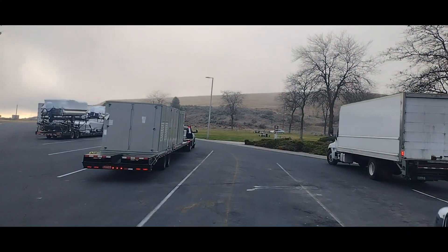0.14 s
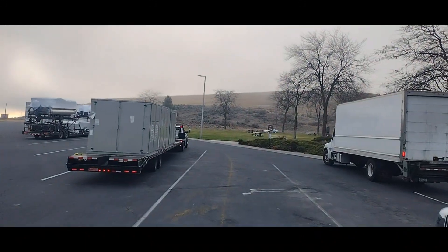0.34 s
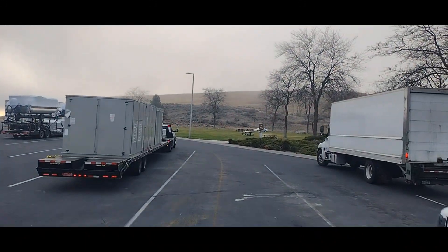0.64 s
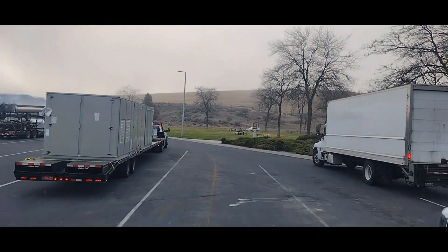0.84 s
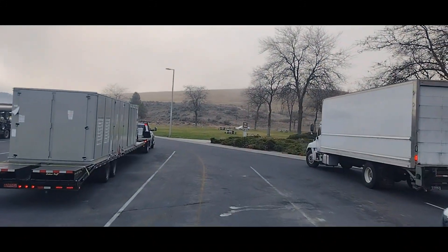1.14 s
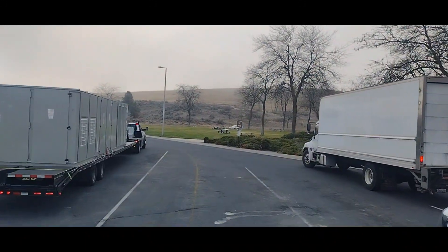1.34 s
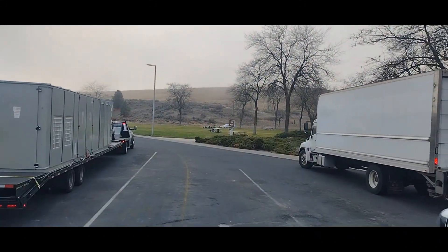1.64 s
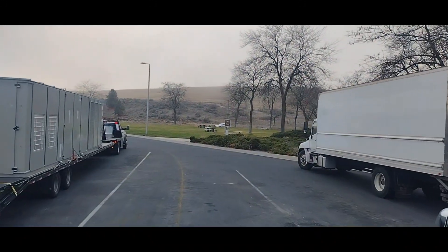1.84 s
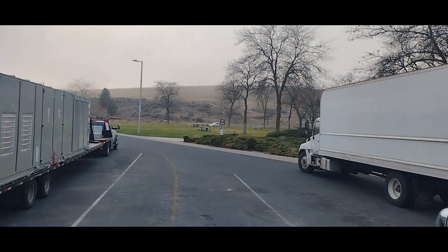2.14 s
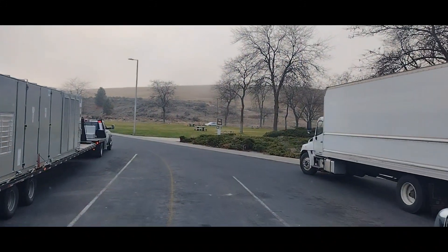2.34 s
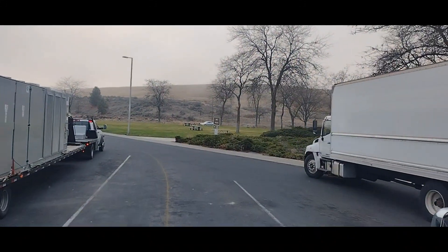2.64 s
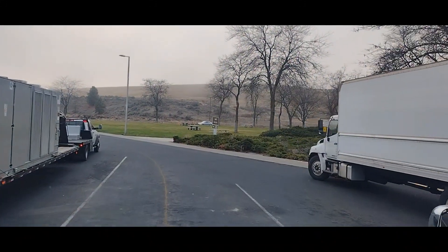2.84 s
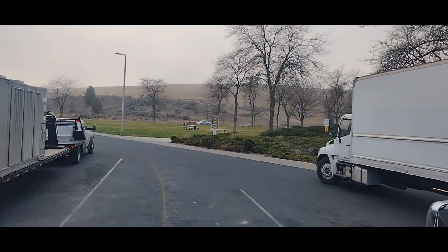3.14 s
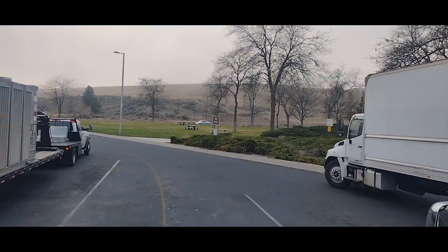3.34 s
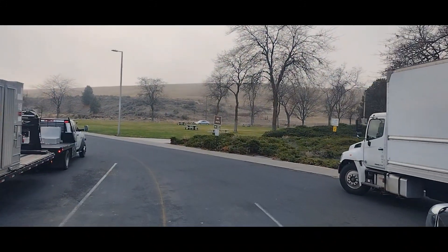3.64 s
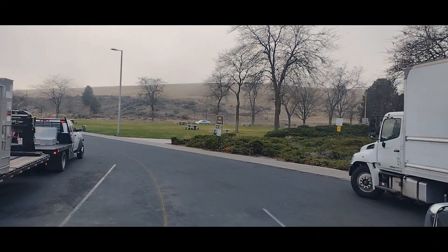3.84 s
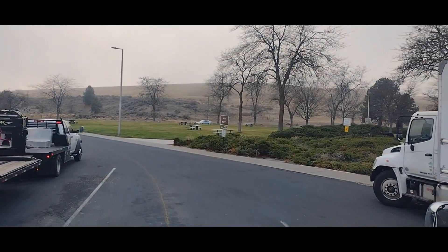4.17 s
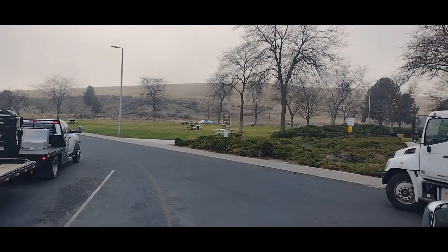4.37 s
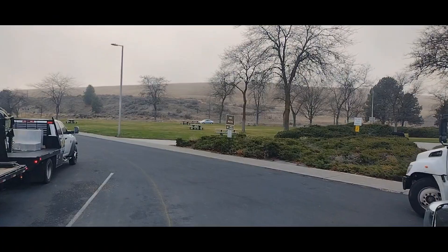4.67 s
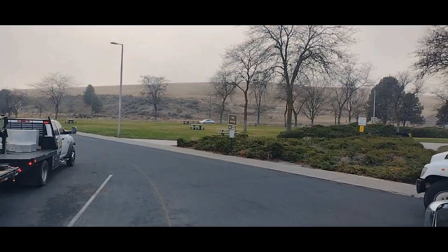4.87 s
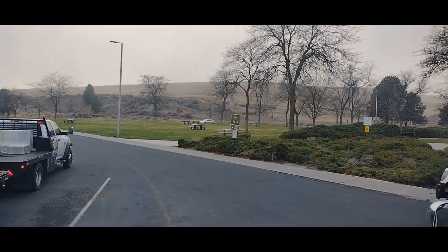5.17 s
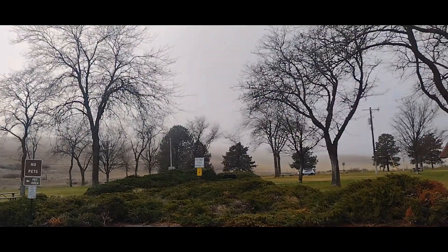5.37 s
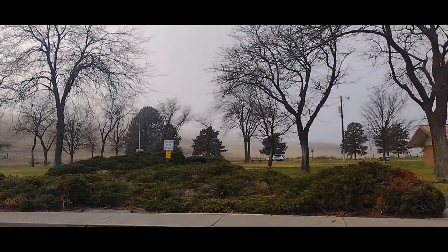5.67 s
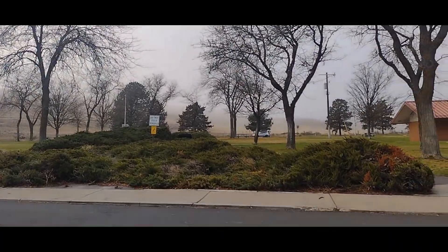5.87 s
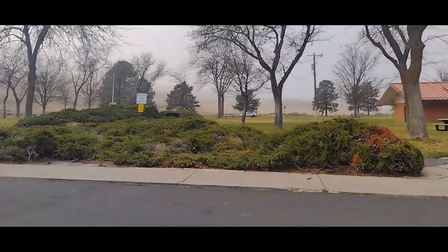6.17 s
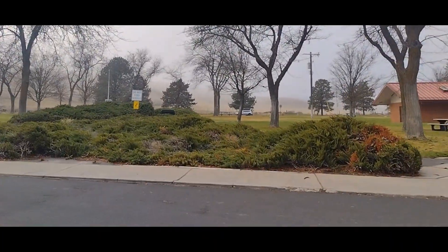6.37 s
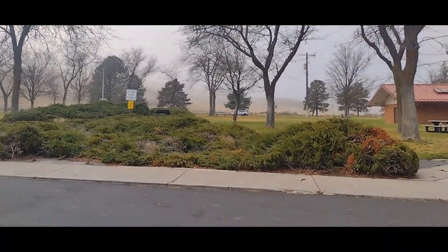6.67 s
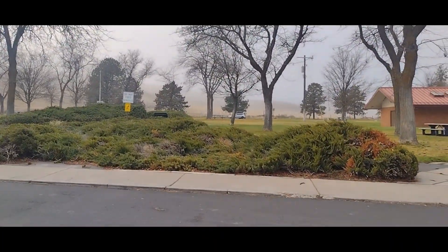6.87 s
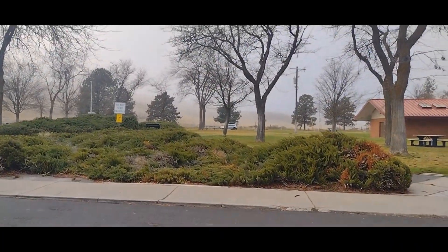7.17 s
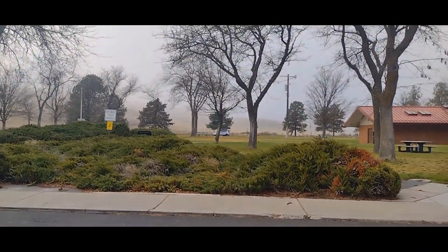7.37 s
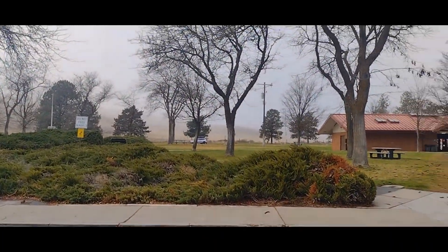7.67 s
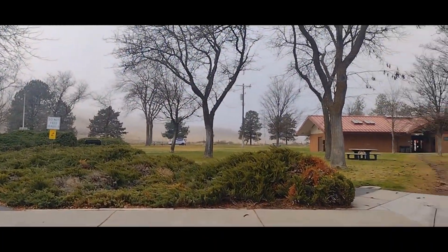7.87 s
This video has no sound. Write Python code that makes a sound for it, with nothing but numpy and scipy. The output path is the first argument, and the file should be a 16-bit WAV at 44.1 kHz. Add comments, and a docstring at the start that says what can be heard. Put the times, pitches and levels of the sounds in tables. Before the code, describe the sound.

Heard in stereo from inside a truck cab moving through a lot. From 0 s a six-cylinder diesel drones with rough clatter, humming panels, a beating metallic ring, low body rumble and a bed of tyre noise and air. Pitch climbs slightly to 2.5 s, with a deep boom swelling around 2 to 3 s. Near 3.1 s there are quick padded knocks, then a soft bump; the load eases, a faint brake groan passes at 3.7 to 4 s, and revs sink and soften toward idle, with small knocks near 4.9 s. At 5.28 s sound cuts to silence. At 5.58 s the engine returns at higher revs, growing quickly, more low and rumbly. Bumps cluster at 5.8 to 6.5 s, again near 7 s, then lighter. A gear whine slides gently down from 6 s; bright ticks, brief rustles, and a late low drone and hiss accompany the slightly slowing engine until 8 s.

```python
"""A six-cylinder diesel truck pulls through a lot, heard inside its cab, then eases off and slows to idle.
After a short silence a second shot fades in, window side: the same engine, a gear whine, bumps and rattles.
The engine is a sum of sines at multiples of its cycle; its clatter is noise, throbbing or repeating each cycle.
Rumble, hiss, tyres and air are coloured noise; bumps, ticks, rustles and knocks are short decaying bursts."""
import sys
import numpy as np
from scipy import signal
from scipy.fft import rfft, irfft, next_fast_len
from scipy.io import wavfile
from scipy.ndimage import uniform_filter1d, map_coordinates

SR = 44100
rng = np.random.default_rng(int(sys.argv[2]) if len(sys.argv) > 2 else 0)


def file_out(sig):
    """Save sig as 16-bit WAV at sys.argv[1]."""
    # one column per channel
    cols = np.atleast_2d(sig).T
    # limit, then scale
    lim = np.clip(cols, -1, 1)
    pcm = np.round(lim * 32767).astype(np.int16)
    wavfile.write(sys.argv[1], SR, pcm)


N = 353241

CUT_OUT_S, CUT_IN_S, FADE_S = 5.283, 5.577, .015
TOP_HZ = 15600

# Firing rate. Each row: time in seconds, rate in Hz.
SPEED = [(0, 56.3), (.9, 58.7), (1.7, 61.2), (2.5, 63.1), (2.75, 62.8), (3.05, 61.5), (3.22, 58.6),
         (3.48, 60.4), (3.62, 59.8), (3.76, 56.2), (4.05, 53.8), (4.5, 44.4), (5.28, 31), (5.58, 66.4),
         (5.9, 66), (6.3, 65.7), (7.5, 63.5), (8.01, 62.5)]
CRANK_START = .1  # part of a cycle already run at the start
# Engine orders. Each row: time in seconds, firing boom in dB, second firing order in dB, uneven orders in dB.
ENGINE = [(0, -71, -32.5, -38), (.7, -60, -37, -40), (1.3, -47, -35, -41.5), (1.62, -53, -38, -45),
          (1.72, -38.5, -37.5, -41.5), (2.08, -29.5, -46, -39), (2.17, -36, -50, -40.5),
          (2.3, -26.5, -34, -47), (2.45, -30.5, -31.5, -40.5), (2.6, -25, -32, -42),
          (2.75, -29, -34.5, -42.5), (3.05, -33, -33.5, -39.5), (3.2, -47, -37, -45.5),
          (3.42, -53, -40, -45), (3.62, -54, -40, -46.5), (3.8, -60, -38, -54), (4.05, -60, -44, -53),
          (4.2, -68, -47, -55), (4.42, -73, -42, -46), (4.6, -69.5, -51, -47), (5.28, -61, -56, -54),
          (5.58, -58, -45, -61.5), (5.85, -40.5, -35, -48), (6.1, -41, -41, -39.5), (6.19, -47, -30.5, -44),
          (6.35, -35, -31, -49.5), (6.48, -34, -25, -41), (6.53, -39, -39, -53), (6.58, -43, -29, -56),
          (6.75, -37, -32, -43.5), (7, -42, -32, -47.5), (7.6, -43, -35, -53), (8.01, -47, -52, -57)]
# Fourth firing order. Each row: time in seconds, level in dB.
FOURTH = [(0, -57), (1.4, -56.5), (1.8, -53), (2.3, -55.5), (4.1, -55.5), (4.35, -48.5), (4.55, -40.5),
          (4.65, -49), (4.8, -43), (5, -48.5), (5.28, -52), (5.58, -69), (5.9, -58), (8.01, -58.5)]
# Cylinders differ, so other orders sound too. Each row: multiple of the cycle, relative level in dB.
UNEVEN = [(5, -15.5), (7, -8), (8, -19), (9, 5.5), (10, 0), (11, -14), (13, -13), (14, -1.5), (15, -4.5),
          (16, -11), (17, -4), (18, -11.5), (19, -12.5), (20, -18), (21, -17), (22, -16.5), (23, -16),
          (25, -21.5), (26, -22), (27, -18.5), (28, -12.5)]
# Swells of uneven orders. Each row: time in seconds, gain above the 20th in dB, gain of the 15th in dB.
UPPER = [(0, 0, -4), (1.4, 0, -2), (1.7, 6, 0), (2.1, 6, -3), (2.4, 1, 0), (3.3, 0, 2), (3.45, 0, 13),
         (3.62, 0, 14), (3.82, 0, 9), (3.95, 0, 0), (8.01, 0, 0)]
# How the cab passes the uneven orders. Each row: frequency in Hz, gain in dB.
CAB = [(40, -14.5), (70, -8.5), (86, -23), (90, -12.5), (94.5, 0), (97, -1), (108, 0.5), (125, -1),
       (150, 0), (180, -0.5), (220, 1), (300, -1.5)]
LOPE_LIFT_DB = 2  # at the window, gain of the uneven multiples not divisible by three
ORDER_SPREAD_RAD = .28  # the cab smears the lope: chance phase lag per order of distance from the 11th

# Engine load, 0 near full pull; it sets clatter and gears, and in the first shot also hiss and panels.
# Each row: time in seconds, load in dB.
LOAD = [(0, -2.5), (.5, -1.5), (2.3, 1), (2.8, 0.5), (3.05, -4.5), (3.6, -10.5), (4, -12.5), (4.6, -16.5),
        (5.28, -20), (5.6, -9.5), (5.72, -1), (5.9, 0), (6.56, -0.5), (7.12, 1.5), (7.65, .5), (7.91, -3.5),
        (8.01, -5.5)]
HISS_PER_LOAD, GEAR_PER_LOAD, PANEL_PER_LOAD = 1, 0.93, 1.01  # dB per dB of load

# Timing gears and pump. Each row: multiple of the cycle, relative level in dB, phase between microphones in rad.
GEARS = [(33, -8, .3), (43, -4, .4), (54, -6, 1.2), (60, 1, 2.3), (66, -5, 1.2), (75, -5, 1.6),
         (84, -2, .6), (90, -5, 1.8), (97, -1, 1.5)]
# Resonances that gear orders cross. Each row: frequency in Hz, half width in Hz, swell in dB.
GEAR_PANELS = [(615.4, 12, 12.5), (850, 13, 3.5), (937, 24, 12)]
GEAR_DB, SIDE_SHADE_DB = -57, -6  # level at zero load; change at the window

# Panels rung by the engine under load. Each row: frequency in Hz, width in Hz, relative level in dB.
PANELS = [(352, 79, -7.5), (442.6, 34, -10), (535, 50, -10.5), (609, 35, -7), (685, 65, -7.5),
          (759, 40, -5), (835.6, 40, -4), (927, 30, -7.5), (1158, 120, -9.5), (2317, 33, -19.5),
          (3380, 90, -35.5), (3750, 80, -33.5), (5740, 190, -34), (6500, 120, -43), (7200, 430, -44.5)]
PANEL_DB, PATTERN_SHARE = -41, .85  # level at zero load; share of the drive's power that repeats each cycle
# One panel rings once a cycle. Each row: time in seconds, level before the beat in dB, beat depth from 0 to 1.
RING = [(0, -52, .9), (.35, -51, .95), (.8, -47, 1), (1.05, -54, .5), (1.5, -50, .7), (1.95, -46, 1),
        (2.2, -46, .95), (2.4, -50, .3), (2.9, -50, .5), (3.1, -58, .5)]
RING_HZ, RING_WIDTH_HZ = 1018, 9
RING_APART_RAD = .3  # phase between the two microphones

# Spectra of rumble, clatter and hiss, in that order. Each row: frequency in Hz, density in dB per Hz.
PULL_COLOUR = ([(15, -46), (25, -29), (55, -12.5), (78, -14.5), (95, -6), (119, -3.5), (155, -10),
               (191, -13.5), (223, -16), (344, -14), (487, -22), (700, -29.5), (910, -53.5), (1540, -120)],
               [(180, -9.5), (300, -7), (409, -17), (442, -2.5), (499, -17), (608, -7.5), (664, -8.5),
               (1010, -5.5), (1080, -7), (1210, -7), (1500, -11), (2090, -15.5), (2500, -29.5), (3680, -47),
               (4200, -57.5), (5460, -72), (9240, -120)], [(1760, -16.5), (3000, 6.5), (3240, -15),
               (3440, 6), (3690, -8.5), (4060, -7.5), (5100, -9), (5740, -3.5), (7250, -5), (7770, -10),
               (8920, -7), (9960, -5.5), (11900, -27), (14700, -39.5), (15600, -21)])
SIDE_COLOUR = ([(15, -48), (25, -35.5), (49, -11.5), (123, 4), (139, -3.5), (184, -3.5), (305, -12),
               (413, -14), (479, -18), (525, -38), (600, -28), (780, -49.5), (1320, -120)], [(180, -32),
               (300, -5.5), (427, -10.5), (474, -7.5), (521, -10), (615, -6.5), (789, -9.5), (1040, -6),
               (1250, -10.5), (1890, -12), (2300, -17.5), (2900, -30.5), (3210, -41), (3600, -62),
               (4680, -68), (7920, -120)], [(1470, -33.5), (2500, -2), (3200, -7), (3600, -9),
               (4300, -11.5), (5380, -17), (9060, -30), (9930, -27), (10700, -29), (14300, -27.5),
               (15600, -29)])
# Likeness of left and right. Each row: frequency in Hz, correlation from -1 to 1.
PULL_LIKE = [(60, 0.99), (130, 0.95), (290, 0.6), (640, 0.23), (1410, -0.28), (3100, 0.17), (6820, -0.11),
             (15000, 0.086)]
SIDE_LIKE = [(60, 0.7), (130, 0.19), (290, 0.82), (640, 0.31), (1410, 0.14), (3100, -0.25), (6820, 0.044),
             (15000, -0.025)]
# Stereo lean before panning. Each row: frequency in Hz, left minus right in dB.
PULL_LEAN = [(60, -0.5), (110, -2.5), (200, 7.5), (380, -4), (700, 6), (1290, 1), (2380, 6), (4400, 9.5),
             (8120, 3), (15000, -0.5)]
SIDE_LEAN = [(60, -7), (110, -2), (200, -6), (380, 1), (700, 2), (1290, 2), (2380, 2), (4400, 2.0),
             (8120, 2), (15000, 2.5)]
PULL_CLATTER_DB, PULL_HISS_DB, PULL_PAN_DB = -38, -62, 1  # clatter and hiss at zero load
SIDE_CLATTER_DB, SIDE_PAN_DB, SIDE_PAN_DB_PER_S = -37, -2, 1.2
# Hiss at the window. Each row: time in seconds, level in dB.
SIDE_HISS = [(5.6, -63.5), (5.75, -59.5), (5.93, -59.5), (6.2, -64), (6.9, -65.5), (7.12, -61.5),
             (8.01, -64.5)]

# Roughness of the ground; it sets body rumble and drumming. Each row: time in seconds, level in dB.
GROUND = [(0, 0.5), (1, -1.5), (2.3, 3.5), (2.75, -3), (3.05, 0.5), (3.55, 0), (3.85, -1), (4.1, -4),
          (4.45, -4), (4.6, -7), (4.85, -5.5), (5.28, -8), (5.6, -29), (5.86, -3.5), (6.5, -0.5), (6.6, -7),
          (6.95, -2), (7.3, -4), (8.01, -4.5)]
RUMBLE_DB, SIDE_RUMBLE_DB, DRUM_DB = -38, -33.5, -38  # at zero roughness
DRUM_RISE_DB_PER_S, DRUM_FULL_S = 3.5, 4.15
# Modes of the truck's body. Each row: frequency in Hz, width in Hz, relative level in dB.
BODY_MODES = [(98.4, 23, -2), (152.3, 15.3, -0.5), (178, 29.5, -6.5)]
# Bumps under the wheels. Each row: start in seconds, level in dB, frequency in Hz, left minus right in dB.
BUMPS = [(3.241, -24, 160, -2), (4.178, -28, 172, -4.5), (5.642, -32, 130, -3), (5.792, -30, 105, 1),
         (5.83, -21.5, 120, -1), (5.912, -16, 143, -8), (5.972, -19.5, 166, -21), (5.995, -21.5, 235, -13),
         (6.03, -23, 142, -4), (6.127, -26, 289, -8), (6.181, -25, 120, 0), (6.214, -15.5, 111, 3),
         (6.434, -15.5, 94, -15), (6.465, -19, 99, -8), (6.495, -22, 99, -11.5), (6.977, -16.5, 122, -14),
         (7.041, -18.5, 124, -9), (7.392, -36, 123, 0), (7.447, -42, 135, 2), (7.674, -31, 111, 16),
         (7.831, -24.5, 138, 14), (7.93, -29, 183, -25)]
SHAKE_DB, SHAKE_T60_S = -13.5, 1.13  # rumble stirred by a bump, relative to the bump

# Gear whine, late low drone and brake groan. Each row: time in seconds, pitch in Hz, level in dB.
WHINE = [(6.02, 492, -56), (6.15, 487, -48), (6.5, 482, -48.5), (6.62, 480, -46), (6.82, 477, -48),
         (6.96, 474.5, -47), (7.12, 472, -54), (7.35, 469, -45.5), (8.01, 460, -50)]
DRONE = [(7.1, 372, -61), (7.4, 380, -48.5), (7.8, 367, -51.5), (8.01, 368, -46)]
GROAN = [(3.7, 573, -53.5), (3.85, 560, -44.5), (3.94, 569, -48), (4.04, 544, -48)]

# Blows. Each row: start in seconds, level in dB, tilt in dB per octave.
KNOCKS = [(3.0858, -34, -2), (3.0922, -25, -1), (3.102, -24, -8.5), (4.095, -34.5, -5), (4.182, -46.5, 5.5),
          (4.881, -42, -15), (4.996, -39, -4.5)]
# What a blow rings. Each row: frequency in Hz, relative level in dB, t60 in seconds.
KNOCK_MODES = [(554, -5, 0.057), (870, -5, 0.13), (1016, 1.5, 0.049), (1157, 3, 0.056), (1395, -4, 0.074),
               (1800, -7.5, .04), (2305, -12, 0.032)]
# Loose things tick. Each row: start in seconds, level in dB, left minus right in dB, centre in Hz.
TICKS = [(4.0935, -69, 0, 14700), (4.1819, -66, 2, 10100), (5.9664, -55, -1, 12600),
         (6.255, -55, -2, 14400), (6.333, -57, -1, 14800), (6.358, -63, -5, 11900), (6.8004, -61, 7, 13900),
         (7.133, -68, 2, 14100), (7.166, -65, 7, 14900), (7.279, -50, 8, 15100), (7.336, -57, 10, 14030),
         (7.6645, -61, 21, 14600), (7.7085, -70, 4, 11000), (7.738, -61, 0, 9820), (7.751, -68, 2.5, 9820),
         (7.994, -53, 0, 14600)]
# Small metal parts. Each row: frequency in Hz, relative level in dB, t60 in seconds.
TICK_MODES = [(8250, -16, .045), (10100, -2.5, .06), (12300, -10, .066), (13000, -13, .04),
              (14000, -7, .057), (14800, -7, .05), (15300, 1, 0.086)]
TICK_SPREAD_OCT, TICK_CLICK_DB = 0.44, 7  # how far from its centre a tick excites modes; its contact click
TICK_WIDTH = .045  # width of the rattling modes, share of their pitch
# Short rustles. Each row: start in seconds, level in dB, left minus right in dB, length in seconds,
# rise in seconds, centre in Hz.
RUSTLES = [(4.17, -76, 2, 0.037, .007, 5200), (4.998, -79, 7, .047, .007, 5200),
           (6.677, -66.5, 16, 0.045, 0.0076, 5200), (6.821, -64.5, 15, 0.063, 0.026, 5200),
           (6.981, -65, 17, 0.07, 0.0081, 5800), (7.662, -60, 23, 0.035, .014, 11000)]
# What the rustling thing rings with. Each row: frequency in Hz, width in Hz, relative level in dB.
RUSTLE_BODY = [(3100, 570, 0), (4240, 600, -1), (5430, 620, -5)]
RUSTLE_GRAIN_DB, RUSTLE_GRAINS_PER_S = 3, 333

# Spectrum of tyres and air. Each row: frequency in Hz, density in dB per Hz.
ROLL_COLOUR = [(290, -25.5), (500, -8.5), (522, 1.5), (686, -2.5), (1350, -28), (2290, -14), (3580, -30),
               (4310, -32), (5050, -37), (6000, -40), (15500, -45)]
# Tyres and air sound under the whole first shot, a little quieter late on. Each row: time in seconds, level in
# dB.
ROLL = [(0, -50.5), (3, -49), (3.5, -51), (4, -49.5), (4.5, -54), (5, -55), (5.28, -55.5)]
# A band of hiss swells late. Each row: time in seconds, level of the noise before the band in dB.
SIZZLE = [(6.7, -78), (7, -70), (7.2, -58), (7.65, -56), (8.01, -56)]
SIZZLE_HZ, SIZZLE_WIDTH_HZ = 4300, 260
SIZZLE_LOW_HZ, SIZZLE_LOW_WIDTH_HZ, SIZZLE_LOW_DB = 2780, 350, 9.5  # a lower band that swells with it


def undb(db):
    """Decibels to amplitude ratio."""
    return 10 ** (np.asarray(db) / 20)


def curves(table):
    """Linear interpolation: the columns of a time table, one value a sample."""
    s, *columns = np.transpose(table)
    return [np.interp(np.arange(N) / SR, s, c) for c in columns]


def over_hz(table, hz):
    """A (Hz, value) table read on a log-frequency axis."""
    f, v = np.transpose(table)
    return np.interp(np.log(hz + 1), np.log(f + 1), v)


def walk(rate, count=1):
    """Random levels held 1 / rate s and smoothed twice by a moving mean; spread near 1."""
    k = int(SR / rate)
    held = np.repeat(rng.standard_normal((count, N // k + 1)), k, axis=1)[:, :N]
    return 1.7 * uniform_filter1d(uniform_filter1d(held, k), k)


def pan(x, db):
    """Level difference between channels: left minus right in dB."""
    return x * undb(np.array([db, -db]) / 2).reshape(2, -1)


def band(x, hz, width_hz):
    """Two-pole resonance with gain 1 at the centre."""
    return signal.lfilter(*signal.iirpeak(min(hz, .45 * SR), hz / width_hz, SR), x)


def mode(x, hz, width_hz):
    """A noise-driven resonance, its gain raised to offset the power a narrow band loses."""
    return band(band(x, hz, width_hz), hz, 3 * width_hz) * np.sqrt(SR / width_hz / np.pi)


def noise(colour, like, lean, patchy_db, rate):
    """Partly correlated stereo noise of a given colour whose half-octaves flicker apart; rms 1."""
    hz, s, cells = signal.stft(rng.standard_normal((2, N)), SR, nperseg=512)
    rows, cols = np.meshgrid(2 * np.log2(hz + 50), s * rate, indexing="ij")
    grid = rng.standard_normal((32, int(N / SR * rate) + 3))
    patches = map_coordinates(grid, [rows, cols], order=1)
    flickering = signal.istft(cells * undb(patchy_db * patches), SR, nperseg=512)[1]
    mid, side = rfft(flickering, next_fast_len(N))
    hz = np.linspace(0, SR / 2, len(mid))
    c = np.clip(over_hz(like, hz), -.99, .99)
    pair = np.sqrt(1 + c) * mid + np.sqrt(1 - c) * side * np.array([[1], [-1]])
    coloured = pan(pair * undb(over_hz(colour, hz)), over_hz(lean, hz))
    x = irfft(coloured, next_fast_len(N))[:, :N]
    return x / x.std()


def tone(hz, db, waver_db=3.0, rate=8, waver_hz=0, apart_rad=0):
    """A stereo sine about the given rms level, wavering in level and pitch."""
    level, pitch = walk(rate, count=2)
    phase = 2 * np.pi * np.cumsum(hz + waver_hz * pitch) / SR
    return np.sqrt(2) * undb(db + waver_db * level) * np.sin(phase + apart_rad * np.array([[-.5], [.5]]))


def add_at(out, s, burst):
    """Superposition: a burst added from s seconds on."""
    out[..., int(s * SR):][..., :burst.shape[-1]] += burst


def engine_orders(hz, cycle):
    """Harmonic series of the cycle: firing orders boom in the cab; weaker multiples make the lope."""
    window = np.arange(N) / SR > CUT_OUT_S
    boom_db, second_db, uneven_db = curves(ENGINE)
    second_db = second_db + 0.61 * window * walk(18)[0]
    fourth_db = curves(FOURTH)[0] + 3.3 * walk(7)[0]
    upper_db, fifteenth_db = curves(UPPER)
    orders = [(6, boom_db), (12, second_db), (24, fourth_db)]
    for k, db in UNEVEN:
        order_db = uneven_db + db + over_hz(CAB, k * hz / 6)
        order_db = order_db + LOPE_LIFT_DB * window * (k % 3 > 0)
        orders.append((k, order_db + upper_db * (k > 20) + fifteenth_db * (k == 15)))
    out, drift = 0, walk(2.5, count=6)
    for i, (k, db) in enumerate(orders):
        # the two microphones sit at different spots of the cab's sound field
        apart = 0.14 * (-1) ** i * np.array([[1], [-1]])
        lag = ORDER_SPREAD_RAD * abs(k - 11) * rng.uniform(-1, 1)
        phase = k * cycle - lag + .3 * drift[(i + 3) % 6] + apart
        out = out + np.sqrt(2) * undb(db + .8 * drift[i % 6]) * np.sin(phase)
    return out


def gears(hz, load_db):
    """Tooth-rate orders of timing gears and pump swell as they cross panel resonances."""
    gear_db = GEAR_DB + GEAR_PER_LOAD * load_db + SIDE_SHADE_DB * (np.arange(N) / SR > CUT_OUT_S)
    out = 0
    for k, db, apart in GEARS:
        f = k * hz / 6
        swell_db = sum(p_db / (1 + ((f - p_hz) / w) ** 2) for p_hz, w, p_db in GEAR_PANELS)
        out = out + tone(f, gear_db + db + swell_db, waver_db=3.5, rate=3.47, apart_rad=apart)
    return out


def clatter_pattern(cycle):
    """Periodicity: valves and pistons clatter alike every cycle, in a slowly changing pattern; rms 1."""
    turns = irfft(np.exp(2j * np.pi * rng.random((2, 2, 2049))))  # two flat-spectrum stereo patterns
    place = (cycle / (2 * np.pi) % 1 * 4096).astype(int)
    mix = np.pi / 4 + .5 * walk(1.05)[0]
    return (np.cos(mix) * turns[0][:, place] + np.sin(mix) * turns[1][:, place]) / turns.std()


def panel_hum(shake, load_db):
    """Forced resonance: narrow panel modes fed by the engine's clatter fade with the load."""
    hum = sum(undb(db + 2.34 * walk(2.07)) * mode(shake, hz, w) for hz, w, db in PANELS)
    return undb(PANEL_DB + PANEL_PER_LOAD * load_db) * hum


def ringing_panel(shake, cycle):
    """Amplitude modulation: one panel's tone beats once a cycle, with a band of clatter around it."""
    ring_db, depth = curves(RING)
    ring = tone(np.full(N, 1. * RING_HZ), ring_db, waver_db=0.4, waver_hz=0.66, apart_rad=RING_APART_RAD)
    beat = 1 + np.clip(depth, 0, 1) * np.cos(cycle + 1.6)
    struck = ring * beat * (np.arange(N) / SR < RING[-1][0])
    return struck + .5 * band(struck * shake, RING_HZ, RING_WIDTH_HZ * 8)


def panels(cycle, load_db):
    """Shared excitation: repeating clatter and plain noise drive all the panels."""
    loose = rng.standard_normal((2, N))
    shake = np.sqrt(1 - PATTERN_SHARE) * loose + np.sqrt(PATTERN_SHARE) * clatter_pattern(cycle)
    return panel_hum(shake, load_db) + ringing_panel(shake, cycle)


def cab_noise(rumble_gain, clatter_db, hiss_db, colour, like, lean, cycle, rumble_patchy_db, throb):
    """Broadband noise: body rumble, clatter modulated by the firings, and hiss, each on its own level."""
    pulse = 1 + throb * np.cos(6 * cycle) + throb * np.cos(3 * cycle)
    rumble = rumble_gain * noise(colour[0], like, lean, rumble_patchy_db, 14)
    clatter = undb(clatter_db) * pulse * noise(colour[1], like, lean, 1.7, 6)
    hiss = undb(hiss_db) * noise(colour[2], like, lean, 0.94, 7.3)
    return rumble + clatter + hiss


def drumming(ground_db):
    """Modal excitation: noise of the uneven ground drums the body modes."""
    ground = 1.22 * rng.standard_normal(N) + .5 * rng.standard_normal((2, N))  # common and separate parts
    drum = sum(undb(db + 1.0 * walk(5)) * mode(ground, hz, w) for hz, w, db in BODY_MODES)
    rise_db = DRUM_RISE_DB_PER_S * np.minimum(np.arange(N) / SR - DRUM_FULL_S, 0)
    return undb(DRUM_DB + ground_db + rise_db) * drum


def wheel_bumps():
    """Impulse response: each bump is a damped sine; also returns the power of the shaking it leaves."""
    bumps, shaking, t = np.zeros((2, N + SR)), np.zeros(N + SR), np.arange(SR // 2) / SR
    for s, db, hz, pan_db in BUMPS:
        thump = np.minimum(t / 0.0061, 1) * undb(-60 * t / 0.081) * np.sin(2 * np.pi * hz * t)
        add_at(bumps, s, pan(undb(db) * band(thump, hz, 2.2 * hz), pan_db))
        shake = np.minimum(t / 0.0057, 1) * undb(db + SHAKE_DB - 60 * t / SHAKE_T60_S)
        add_at(shaking, s, shake ** 2)
    return bumps[:, :N], shaking[:N]


def lone_tones():
    """Sines of gliding pitch: the gear whine, the late drone and the brake groan."""
    out, t = 0, np.arange(N) / SR
    for table, waver_db in ((WHINE, 1.8), (DRONE, 2.2), (GROAN, 1.1)):
        sounding = (t > table[0][0]) * (t <= table[-1][0])
        out = out + tone(*curves(table), waver_db=waver_db, rate=20, waver_hz=1.3) * sounding
    return out


def knocks():
    """Modal decay: a padded blow rings a few damped sines under a short noisy clack."""
    out, t = np.zeros((2, N + SR)), np.arange(SR // 2) / SR
    soft = np.minimum(t / 0.0036, 1) ** 2  # a padded blow takes a few ms to build
    for s, db, tilt_db in KNOCKS:
        knock = 0
        for k, (hz, mode_db, t60) in enumerate(KNOCK_MODES):
            level_db = mode_db + tilt_db * np.log2(hz / KNOCK_MODES[0][0]) - 60 * t / t60
            phase = k * np.array([[k], [k + 1.16]])
            knock = knock + undb(level_db) * np.sin(2 * np.pi * hz * t + phase)
        rough = band(band(rng.standard_normal((2, len(t))), 2500, 3700), 3300, 7000)
        clack = 0.18 * undb(2 * tilt_db) * rough * undb(-60 * t / 0.14)
        add_at(out, s, pan(undb(db) * soft * (knock + clack), 3.3))
    return out[:, :N]


def ticks():
    """Selective excitation: a contact click and decaying noise bands at the modes near its centre."""
    out, t = np.zeros((2, N + SR)), np.arange(SR // 2) / SR
    for s, db, pan_db, hz in TICKS:
        ring = 0
        for f, mode_db, t60 in TICK_MODES:
            a, b = rng.standard_normal(2)  # chance level and pitch
            off_db = 6 * (np.log2(f / hz) / TICK_SPREAD_OCT) ** 2
            width_hz = TICK_WIDTH * f
            rattle = band(rng.standard_normal((2, len(t))), f * (1 + .012 * b), width_hz)
            rattle = rattle * np.sqrt(SR / (2 * np.pi * width_hz))
            ring = ring + undb(mode_db + 2.4 * a - off_db - 60 * t / t60) * rattle
        click = undb(TICK_CLICK_DB - 60 * t / 0.025) * band(rng.standard_normal((2, len(t))), hz, 0.5 * hz)
        add_at(out, s, pan(undb(db) * (ring + click) * np.minimum(t / 0.004, 1), pan_db))
    return out[:, :N]


def rustles():
    """Friction noise: short swells of grainy scratching, coloured by resonances."""
    out, t = np.zeros((2, N + SR)), np.arange(SR // 2) / SR
    for s, db, pan_db, length, rise, hz in RUSTLES:
        swell = np.minimum(t / rise, 1) * np.exp(-(t / length) ** 2.4)
        grain_db = RUSTLE_GRAIN_DB * walk(RUSTLE_GRAINS_PER_S)[0, :len(t)]
        grain = undb(grain_db) * rng.standard_normal(len(t))
        scratch = band(grain, hz, 1.3 * hz)
        scratch = scratch + sum(undb(b_db) * band(grain, b_hz, w) for b_hz, w, b_db in RUSTLE_BODY)
        add_at(out, s, pan(undb(db) * scratch * swell, pan_db))
    return out[:, :N]


def tyres_and_air():
    """Flow and contact noise: a broadband bed with its own slow level."""
    return undb(curves(ROLL)[0]) * noise(ROLL_COLOUR, PULL_LIKE, PULL_LEAN, 1.0, 6.5)


def sizzle():
    """Band-passed noise: two bands of hiss swell together late."""
    out, swell_db = 0, curves(SIZZLE)[0]
    for hz, w, db in ((SIZZLE_HZ, SIZZLE_WIDTH_HZ, 0), (SIZZLE_LOW_HZ, SIZZLE_LOW_WIDTH_HZ, SIZZLE_LOW_DB)):
        out = out + undb(swell_db + db) * band(band(rng.standard_normal((2, N)), hz, w), hz, w)
    return out


def scene():
    """Superposition of the sources in two shots, with silence between them."""
    t, (hz,), (load_db,), (ground_db,) = np.arange(N) / SR, curves(SPEED), curves(LOAD), curves(GROUND)
    cycle = 2 * np.pi * (CRANK_START + np.cumsum(hz / 6) / SR)  # six firings a cycle; phase in rad
    motor = engine_orders(hz, cycle) + gears(hz, load_db)
    bumps, shaking = wheel_bumps()
    # powers add: steady rumble and the shaking after bumps
    pull_rumble = np.sqrt(undb(RUMBLE_DB + ground_db) ** 2 + shaking)
    side_rumble = np.sqrt(undb(SIDE_RUMBLE_DB + ground_db) ** 2 + shaking)
    pull = cab_noise(pull_rumble, PULL_CLATTER_DB + load_db, PULL_HISS_DB + HISS_PER_LOAD * load_db,
                     PULL_COLOUR, PULL_LIKE, PULL_LEAN, cycle, 0.66, 0.073)
    side = cab_noise(side_rumble, SIDE_CLATTER_DB + load_db, curves(SIDE_HISS)[0],
                     SIDE_COLOUR, SIDE_LIKE, SIDE_LEAN, cycle, 1.7, 0.074)
    side = pan(side, SIDE_PAN_DB + SIDE_PAN_DB_PER_S * (t - CUT_IN_S))
    common = pan(motor, -0.66) + bumps + lone_tones() + knocks() + ticks() + rustles()
    first = common + panels(cycle, load_db) + pan(pull, PULL_PAN_DB) + drumming(ground_db) + tyres_and_air()
    second = common + side + sizzle()
    fade_out = np.clip((CUT_OUT_S - t) / FADE_S, 0, 1)
    fade_in = np.where(t > CUT_IN_S, np.clip(0.16 + (t - CUT_IN_S) / FADE_S, 0, 1), 0)
    return fade_out * first + fade_in * second


def record(dry):
    """Band limiting: the phone cuts the top, a steep elliptic low-pass."""
    return signal.sosfilt(signal.ellip(10, .2, 80, TOP_HZ, fs=SR, output="sos"), dry)


dry = scene()
out = record(dry)
file_out(out)
```